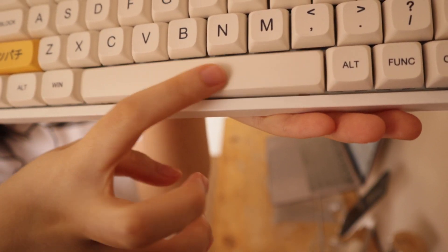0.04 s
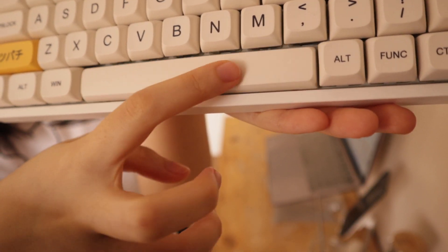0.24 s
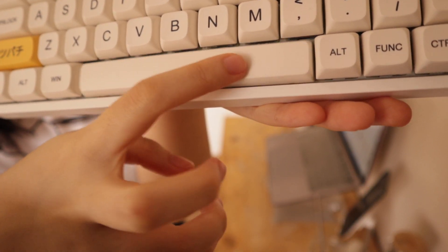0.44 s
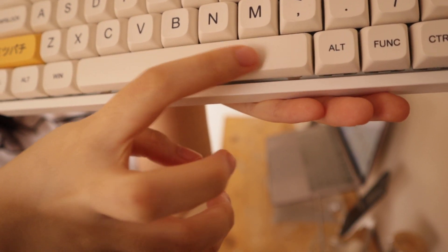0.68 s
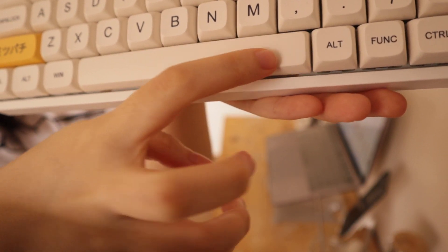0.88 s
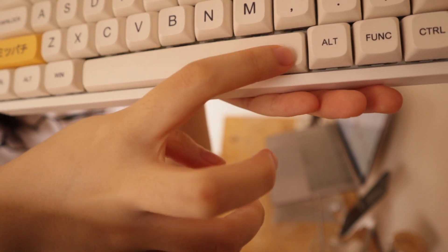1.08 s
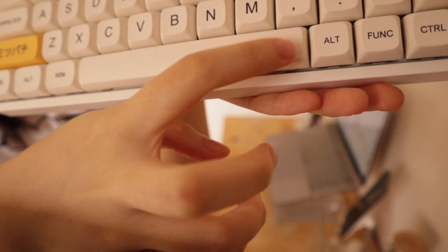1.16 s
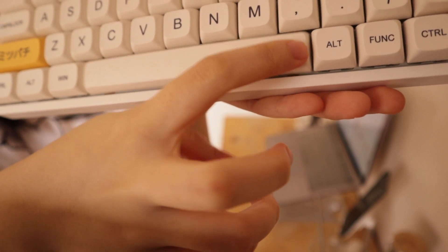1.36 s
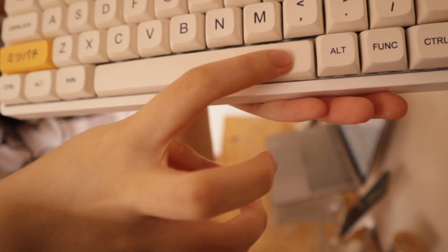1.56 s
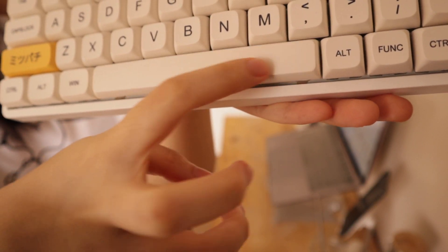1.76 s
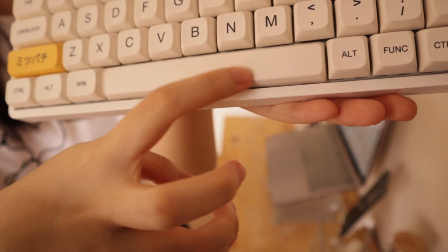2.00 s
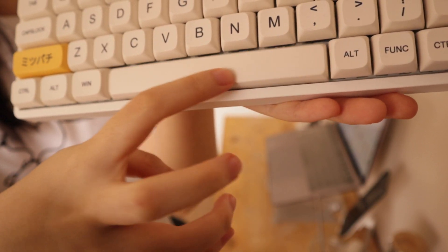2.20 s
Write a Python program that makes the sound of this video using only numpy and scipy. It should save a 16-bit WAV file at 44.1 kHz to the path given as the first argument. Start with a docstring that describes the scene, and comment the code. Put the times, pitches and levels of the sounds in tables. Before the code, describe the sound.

A finger taps the space bar of a mechanical keyboard about six times a second, without a break. Each stroke is a soft touch, a hollow thock with a bright tick as the bar hits bottom, then a lighter pop as it springs back. The taps grow slightly louder and faster. They sound close, in a quiet room with a faint echo and low hum.

```python
"""One finger taps the space bar of a hand-held mechanical keyboard, about six times a second.
Each stroke has three sounds: the fingertip lands on the cap, the bar hits bottom with a hollow thock,
and it springs back with a small falling pop. The blows make the bar, plate and case ring, the air
under the cap sounds a short sliding note, and the switch adds a bright tick.
The quiet room answers faintly, over a low hum and hush that swell once."""
import sys
import numpy as np
from scipy import signal
from scipy.fft import rfft, irfft
from scipy.io import wavfile

SR = 44100
rng = np.random.default_rng(int(sys.argv[2]) if len(sys.argv) > 2 else 0)


def wav_record(signal):
    """Record a signal, one row per channel, as 16-bit PCM in the file named by sys.argv[1]."""
    frames = np.transpose(np.atleast_2d(signal))
    bounded = np.clip(frames, -1, 1)
    # unit amplitude maps onto the largest positive 16-bit level
    quanta = np.round(bounded * 32767).astype(np.int16)
    wavfile.write(sys.argv[1], SR, quanta)


N = 98607
TIME = np.arange(N) / SR

# When each stroke lands, hits bottom and springs back: touch_s, bottom_s, release_s, strength_db
STROKE_TIMES = [(-0.08, -0.065, -0.004, -15), (0.0898, 0.105, 0.1617, -15), (0.2635, 0.2735, 0.338, -10.3),
                (0.4363, 0.4473, 0.5197, -11), (0.6117, 0.6228, 0.6938, -10.6),
                (0.7756, 0.7912, 0.849, -11), (0.9481, 0.962, 1.0175, -9.8), (1.1109, 1.1235, 1.1887, -8.2),
                (1.2741, 1.286, 1.353, -9.6), (1.419, 1.4309, 1.4903, -9.2), (1.5774, 1.5848, 1.6643, -6.4),
                (1.7334, 1.7482, 1.8076, -10.3), (1.885, 1.893, 1.958, -7.2),
                (2.0522, 2.0609, 2.1176, -7.7), (2.2082, 2.2176, 2.28, -9.3)]
# An ordinary stroke: its strength, its time from touch to bottom, and how long it is held down
USUAL_DB, USUAL_TRAVEL_S, USUAL_HOLD_S = -10, .012, .064


def bar_hits_bottom(tick_noise):
    """The bar hits bottom: the whole board thocks, the switch ticks and its spring rings thinly."""
    # Tone of the ringing switch spring: pitch_hz, level_db
    spring_tone = [(4400, -30), (4800, -18), (4930, 56), (5400, -4), (5800, -4), (6800, -6), (8500, -4),
                   (9500, -30)]
    far_end_delay_s = 0.001619
    out, spring_noise = np.zeros(N), shaped_noise(spring_tone)
    for touch_s, bottom_s, _, strength_db in STROKE_TIMES:
        blow = knock(finger_place(bottom_s), top_hz=3366, db_per_octave=2.5, ring_scale=0.8)
        thock = from_db(strength_db - 0.15) * blow
        add(out, bottom_s, thock)
        add(out, bottom_s + far_end_delay_s, from_db(-13.5) * thock)   # the far end lands later
        speed = USUAL_TRAVEL_S / (bottom_s - touch_s)
        tick_db = strength_db + 2 * np.log2(speed)   # a faster stroke ticks louder
        stem = from_db(2.9) * stem_crack(low_hz=4860, high_hz=6850)
        tick = from_db(-14.5) * noise_burst(tick_noise, fade_s=0.014)
        spring = from_db(-37.0) * noise_burst(spring_noise, fade_s=0.098, size=12000)
        for part in stem, tick, spring:
            add(out, bottom_s, from_db(tick_db) * part)
    return out


def fingertip_lands(tick_noise):
    """The fingertip knocks the cap softly; the note of the air under it rises as the bar sinks."""
    soft_stroke, slack_delay_s = 10, 0.002788
    out = np.zeros(N)
    for stroke, (touch_s, _, _, strength_db) in enumerate(STROKE_TIMES):
        level_db = strength_db - 12.5
        if stroke == soft_stroke:
            level_db -= 12
        cap = knock(finger_place(touch_s), top_hz=3740, db_per_octave=-5.5, ring_scale=0.3)
        air = air_note(start_hz=1000, end_hz=1570, glide_s=.0009, swell_s=.005, fade_s=.0095)
        tick = noise_burst(tick_noise, fade_s=0.0089)
        for part_db, part in (-7.0, cap), (33.0, air), (-14.5, tick):
            add(out, touch_s, from_db(level_db + part_db) * part)
        # the finger takes up the slack of the loose bar, which knocks again
        slack = knock(place=0.51, top_hz=3630, db_per_octave=4.5, ring_scale=0.45)
        add(out, touch_s + slack_delay_s, from_db(level_db - 3) * slack)
    return out


def bar_springs_back(tick_noise):
    """The spring throws the bar up: its ends snap lightly, and a pop falls as the hollow opens."""
    loss_db_per_s = 400   # the longer the finger lingers, the softer the release
    out = np.zeros(N)
    for _, bottom_s, release_s, strength_db in STROKE_TIMES:
        linger_s = release_s - bottom_s - USUAL_HOLD_S
        level_db = -23 + 0.67 * (strength_db - USUAL_DB) - loss_db_per_s * linger_s
        snap = knock(place=1, top_hz=3354, db_per_octave=4.0, ring_scale=0.57)
        pop = air_note(start_hz=2000, end_hz=1270, glide_s=.0024, swell_s=.0034, fade_s=.028)
        tick = noise_burst(tick_noise, fade_s=0.014)
        for part_db, part in (-3.0, snap), (11.5, pop), (-20.5, tick):
            add(out, release_s, from_db(level_db + part_db) * part)
    return out


def knock(place, top_hz, db_per_octave, ring_scale, size=2000):
    """One blow rings all the natural notes of the board; the contact cuts off those above top_hz."""
    # Notes of the bar, plate and case: pitch_hz, middle_db (struck there), fade_s, end_gain_db
    board_notes = [(226, -11, 0.33, 4.5), (348, -10, 0.044, -0.5), (483, -3, 0.039, -1.5),
                   (552, -7, 0.081, -5.5), (643, 3, 0.012, -4), (972, -1, 0.017, -7.5),
                   (1141, -6.5, 0.04, 4.5), (1259, -2.5, 0.042, -2.5), (1554, -2.5, 0.028, -4.5),
                   (1760, -47, 0.055, 27), (1777, 2, 0.013, -21), (2082, 13.5, 0.0037, -11.5),
                   (2438, -7.5, 0.022, -10), (3035, -25, 0.016, 9.5), (3418, -16.5, 0.021, 5)]
    pitch_hz, middle_db, fade_s, end_gain_db = np.transpose(board_notes)[:, :, None]
    pitch_hz = pitch_hz * (1 + .006 * rng.standard_normal(pitch_hz.shape))   # the grip shifts each note
    level_db = middle_db + place * end_gain_db + db_per_octave * np.log2(pitch_hz / 1000)
    level_db += rng.standard_normal(pitch_hz.shape)
    fade_s = np.minimum(fade_s * ring_scale, .034)   # the hand under the case stops long ringing
    # high notes bend the bar, and neighbours among them swing opposite ways
    direction = np.where(pitch_hz > 1400, (-1) ** np.arange(len(pitch_hz))[:, None], 1)
    waves = direction * np.cos(2 * np.pi * pitch_hz * TIME[:size])
    ringing = (from_db(level_db) * fade(fade_s, size) * waves).sum(axis=0)
    ringing = pass_filter(ringing, top_hz, "low", order=16)
    ringing = pass_filter(ringing, 215, "high", order=4)
    return smear(ringing, pitch_hz=1035, width_hz=326)


def smear(sound, pitch_hz, width_hz):
    """Slow bending waves arrive after fast ones: this delays some pitches but keeps their levels."""
    radius = np.exp(-np.pi * width_hz / SR)
    feedback = [1, -2 * radius * np.cos(2 * np.pi * pitch_hz / SR), radius ** 2]
    return signal.lfilter(feedback[::-1], feedback, sound)


def finger_place(time_s):
    """Where the finger is on the bar, from 0 (middle) to 1 (right end)."""
    # The finger wanders out along the bar and back: time_s, place
    finger_path = [(0.1, 0.47), (0.45, 0.48), (1.29, 1), (1.75, 1), (1.89, 0.21), (2.22, 0.7)]
    return np.clip(np.interp(time_s, *np.transpose(finger_path)), 0, 1)


def air_note(start_hz, end_hz, glide_s, swell_s, fade_s, size=4000):
    """The air under the cap rings, its note sliding as the moving bar resizes the hollow."""
    t = TIME[:size]
    pitch_hz = end_hz + (start_hz - end_hz) * np.exp(-t / glide_s)
    swell = 1 - np.exp(-(t / swell_s) ** 2)
    return np.sin(2 * np.pi * np.cumsum(pitch_hz) / SR) * swell * fade(fade_s, size)


def stem_crack(low_hz, high_hz):
    """The first instant of the switch stem's hard contact: one sharp, bright pulse."""
    pulse = pass_filter(signal.unit_impulse(300), low_hz, "high", order=6)
    return pass_filter(pulse, high_hz, "low", order=2)


def noise_burst(noise, fade_s, size=1500):
    """Many close, high notes die away together, made from a new slice of noise each time."""
    start = rng.integers(0, N - size)
    return noise[start:start + size] * fade(fade_s, size)


def room_echo(sound):
    """Nearby surfaces scatter the sound at once; the walls follow with a longer tail."""
    # Tone of the room's echo: pitch_hz, level_db
    echo_tone = [(150, -39), (350, 0.5), (600, 6.5), (1200, -2.5), (2000, -0.5), (3500, 3.5), (6000, 0.5),
                 (15000, 5)]
    nearby = from_db(-34.5) * fade(fade_s=0.018)
    walls = from_db(-39.5) * fade(fade_s=0.27)
    onset = np.clip(TIME / 0.00077 - 1, 0, 1)
    echo = shaped_noise(echo_tone) * (nearby + walls) * onset
    return signal.fftconvolve(sound, echo)[:N]


def hum_and_hush():
    """The room's hush and a few wavering hum notes swell once and sink together."""
    # Notes of the room's hum: pitch_hz, level_db (compared with the hush)
    hum_notes = [(49.5, -12.5), (120, -15.5), (242, -10), (367, -8.5)]
    # Tone of the room's hush: pitch_hz, level_db
    hush_tone = [(20, -36), (33, -27), (48, 1), (70, 3.5), (170, 3.5), (300, 3.5), (480, 5), (850, -0.5),
                 (1300, -0.5), (2000, -5.5), (2500, -12), (3400, -13), (4200, -20), (8400, -28.5),
                 (16000, -33.5)]
    hum = np.zeros(N)
    for pitch_hz, level_db in hum_notes:
        gain = np.sqrt(2) * from_db(level_db + 1.05 * drift(rate_hz=8.2))
        hum += gain * np.sin(2 * np.pi * pitch_hz * TIME + 1.34 * drift(rate_hz=2.9))
    peak_s, half_width_s = 1.615, 0.71
    swell_db = 5.5 * np.exp(-((TIME - peak_s) / half_width_s) ** 2)
    return from_db(-42.5 + swell_db) * (shaped_noise(hush_tone) + hum)


def shaped_noise(tone):
    """Noise of average size 1; rows of (pitch_hz, level_db) set how strong each pitch is in it."""
    pitch_hz, level_db = np.transpose(tone)
    all_hz = np.maximum(np.fft.rfftfreq(N, 1 / SR), 1)
    gains = from_db(np.interp(np.log(all_hz), np.log(pitch_hz), level_db))
    return unit_size(irfft(rfft(rng.standard_normal(N)) * gains, N))


def drift(rate_hz):
    """A slow random wobble of average size 1, mostly slower than rate_hz."""
    gains = np.exp(-(np.fft.rfftfreq(N, 1 / SR) / rate_hz) ** 2)
    return unit_size(irfft(rfft(rng.standard_normal(N)) * gains, N))


def unit_size(sound):
    """Scale a sound so that its average size (root mean square) is 1."""
    return sound / np.sqrt(np.mean(sound ** 2) + 1e-20)


def from_db(level_db):
    """Turn decibels into a number to multiply by."""
    return 10 ** (np.asarray(level_db) / 20)


def fade(fade_s, size=N):
    """A fade, size samples long, that has fallen 60 dB after fade_s seconds."""
    return from_db(-60 * TIME[:size] / fade_s)


def pass_filter(sound, edge_hz, keep, order):
    """Keep the "low" or "high" side of edge_hz; a higher order cuts more steeply."""
    return signal.sosfilt(signal.butter(order, edge_hz, keep, fs=SR, output="sos"), sound + 1e-18)


def add(out, start_s, sound):
    """Mix a sound in at start_s; what falls outside the scene is dropped."""
    at = round(start_s * SR) + np.arange(len(sound))
    inside = (at >= 0) & (at < N)
    out[at[inside]] += sound[inside]


def scene():
    """The three sounds of each stroke in the quiet room, on one channel."""
    # Tone of the stem's bright tick in the switch: pitch_hz, level_db
    tick_tone = [(2500, -3.5), (3500, 20), (4000, -57), (4700, -5), (5200, 7), (6000, -8.5), (7000, 2),
                 (8500, -1), (9300, -15.5), (12000, -27), (15500, -41)]
    tick_noise = shaped_noise(tick_tone)
    taps = fingertip_lands(tick_noise) + bar_hits_bottom(tick_noise) + bar_springs_back(tick_noise)
    return (taps + room_echo(taps) + hum_and_hush())[None]


def record(dry):
    """Clip any peak beyond full scale, then cut the treble above 16000 Hz."""
    treble_cut = signal.ellip(10, .1, 70, 16000, fs=SR, output="sos")
    return signal.sosfilt(treble_cut, np.clip(dry, -1, 1))


dry = scene()
out = record(dry)
wav_record(out)
```